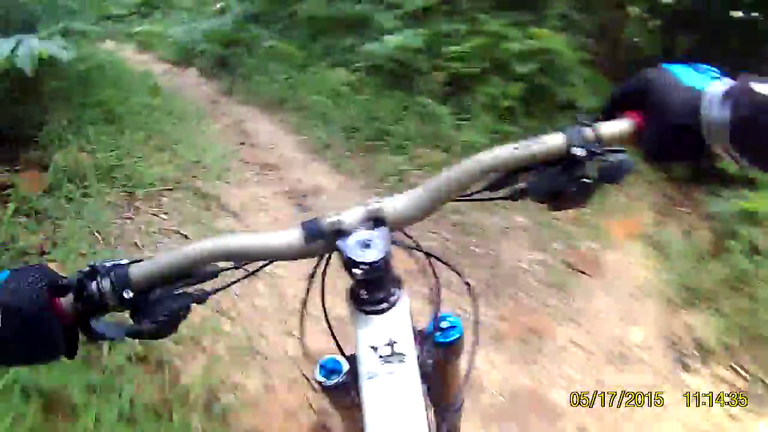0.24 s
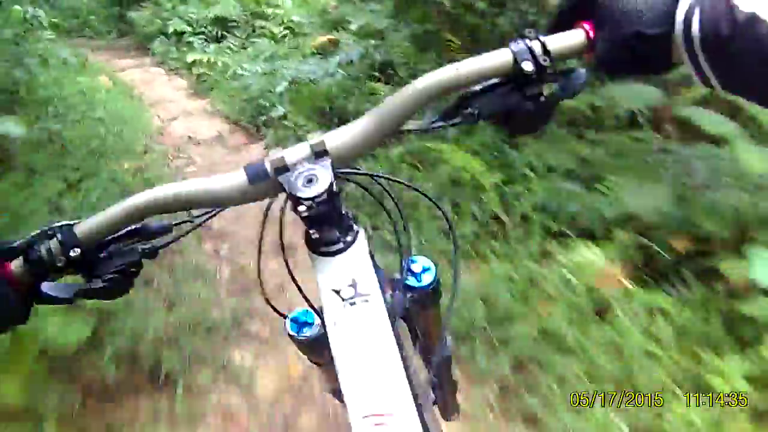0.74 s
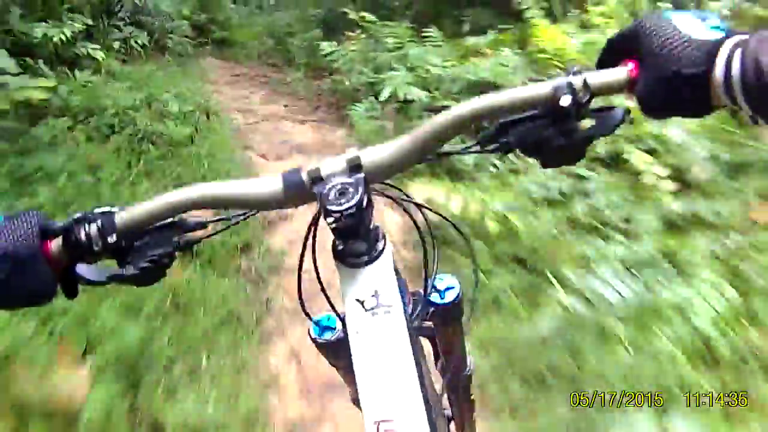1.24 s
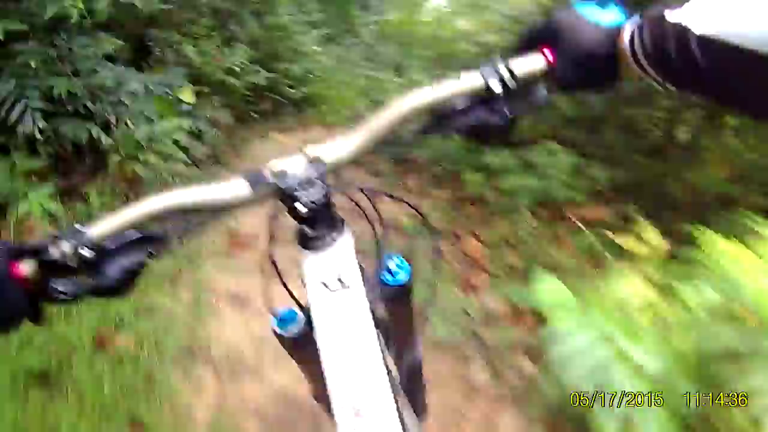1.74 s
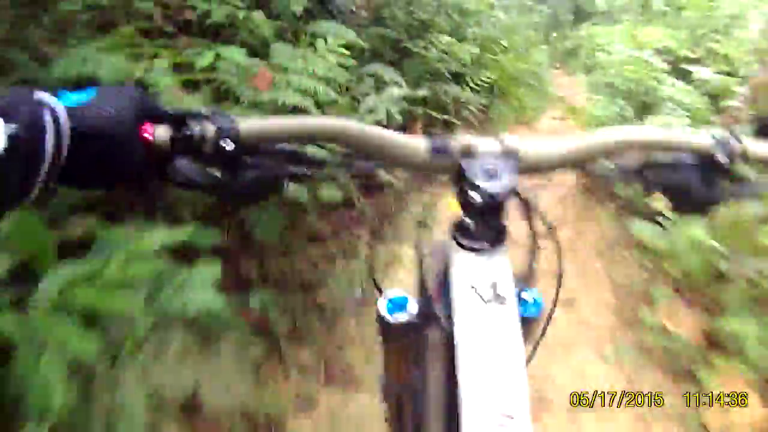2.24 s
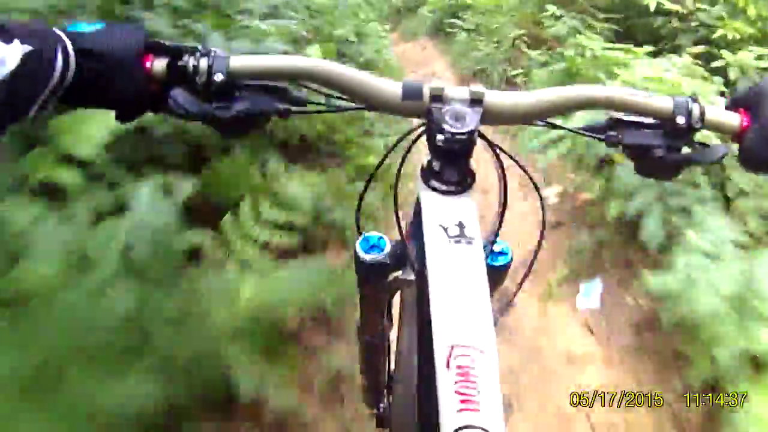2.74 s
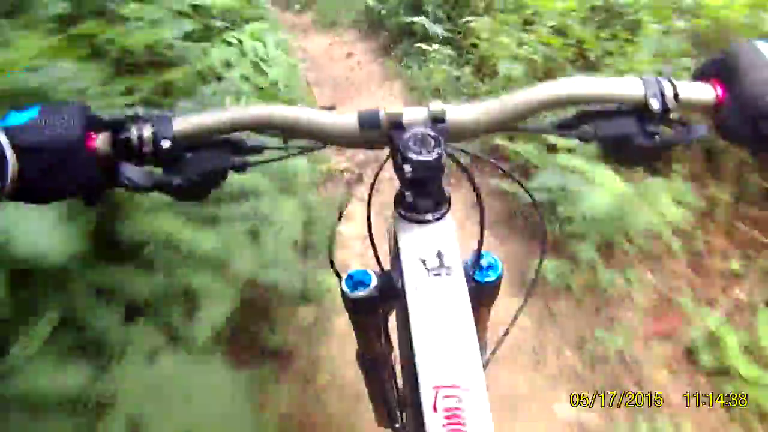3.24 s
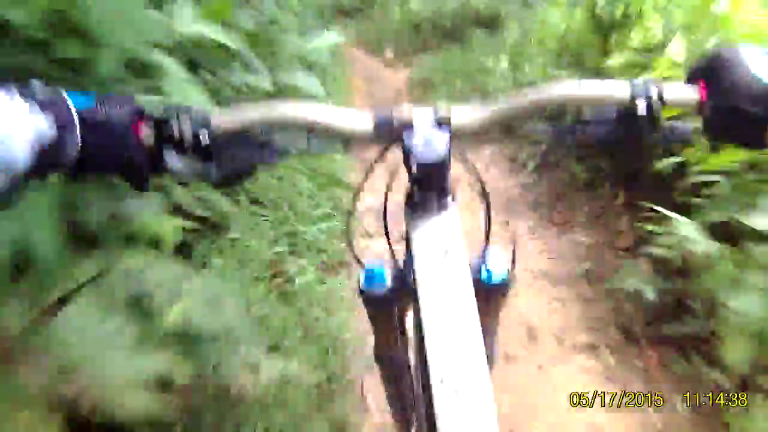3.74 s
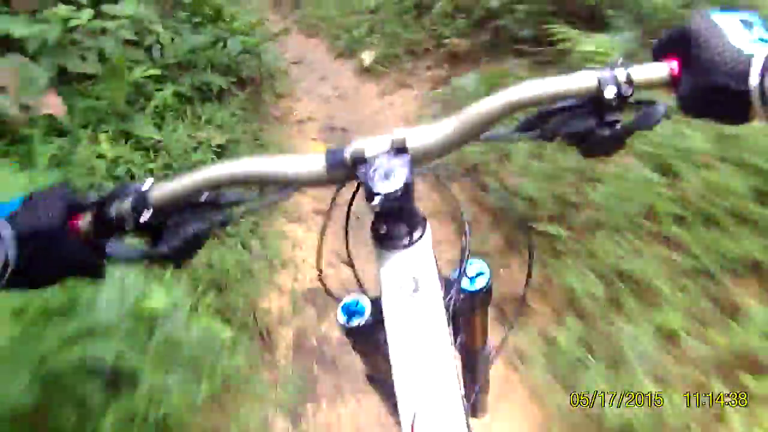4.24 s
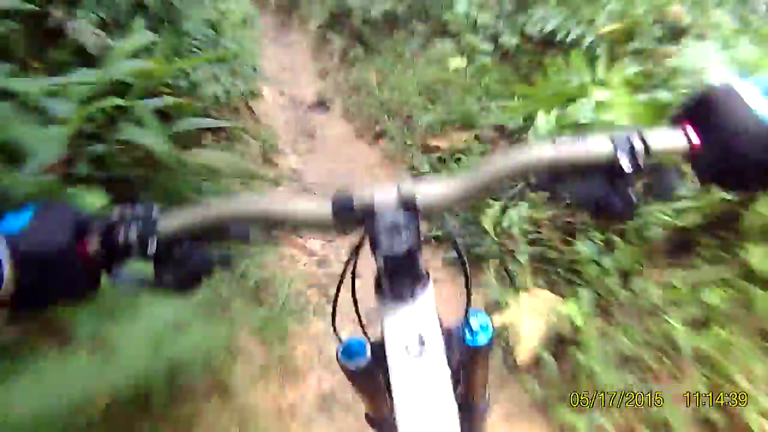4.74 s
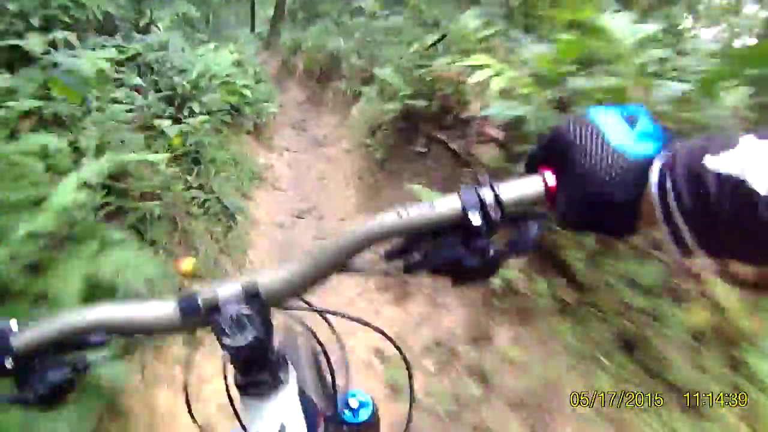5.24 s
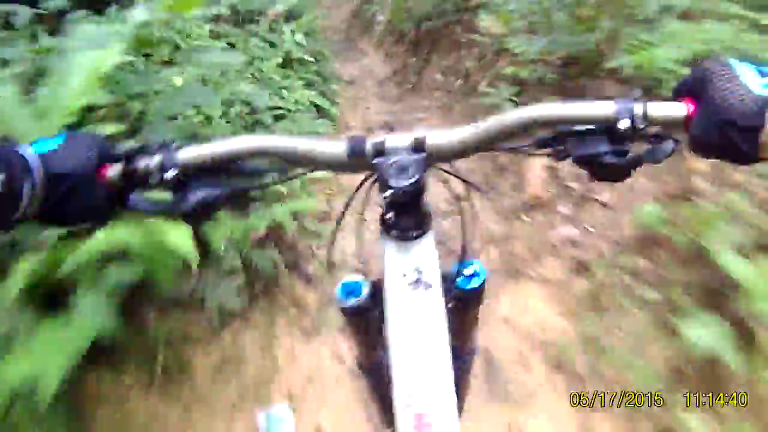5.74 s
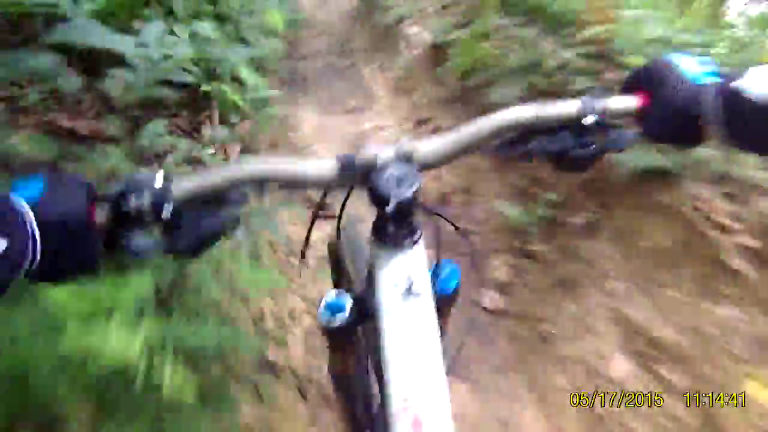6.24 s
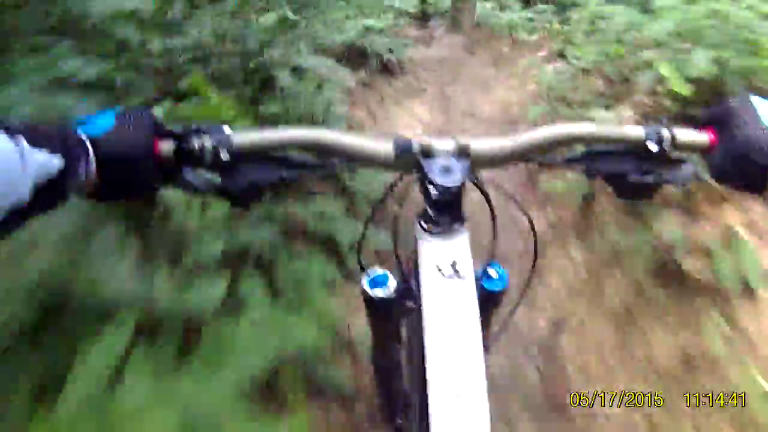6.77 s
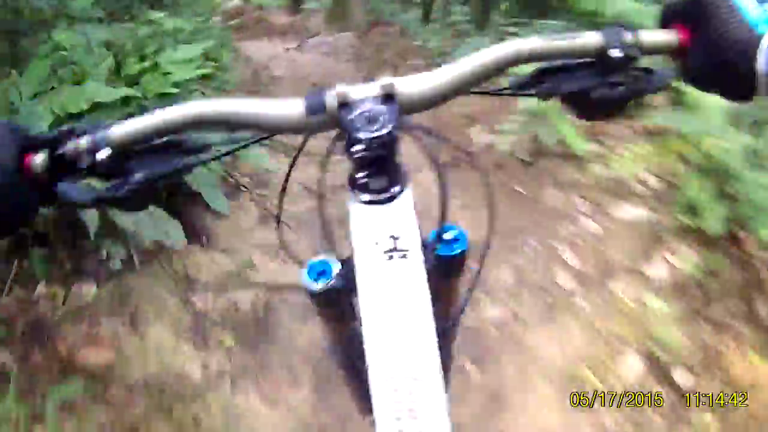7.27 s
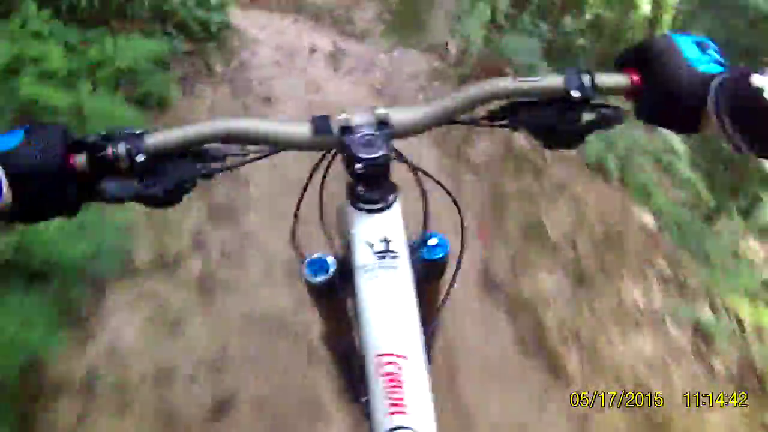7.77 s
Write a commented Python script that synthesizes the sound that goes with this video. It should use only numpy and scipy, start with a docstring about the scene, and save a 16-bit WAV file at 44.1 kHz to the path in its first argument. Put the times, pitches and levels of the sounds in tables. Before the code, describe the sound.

Outdoor ride on rough ground, very close and boxy microphone in a plastic housing. Soft wind rumble and gritty tyres open, with a small lever clack and leafy swishes. The trail then turns rough: clustered plastic knocks, chesty thumps, loose dirt scuffs and metallic chain showers. The hardest bumps clip around six seconds; a brief calmer spell brings brake squeaks and a grit tick before two or three last strong knocks.

```python
"""Rough dirt trail: a mountain bike rolls down, heard from a camera in a plastic case on the rider's chest.
Camera knocks ring the modes of the case and thuds are damped sines; wind and ground rumble are filtered noise.
Tyres, chain and leaves are filtered random clicks under gain curves; the brake chirps as short drifting sines.
A lever clack and one grit tick ring small mode sets. Hiss, a thin whine, clipping and band limits come last."""
import sys
import numpy as np
from scipy import signal
from scipy.fft import rfft, irfft, next_fast_len
from scipy.io import wavfile
from scipy.ndimage import uniform_filter1d

SR = 44100
rng = np.random.default_rng(int(sys.argv[2]) if len(sys.argv) > 2 else 0)


def wrap_up_sound(samples):
    """Save the sound to the file named by the first command line argument, as 16-bit audio."""
    columns = np.atleast_2d(samples).T
    # keep every value between -1 and 1, then stretch to whole-number steps
    tamed = np.clip(columns, -1, 1)
    steps = np.round(tamed * 32767).astype(np.int16)
    wavfile.write(sys.argv[1], SR, steps)


N = 353227
TIME = np.arange(N) / SR
EVENT_TIME = np.arange(SR // 8) / SR


def amp(db):
    """Decibels to gain."""
    return 10 ** (np.asarray(db) / 20)


def evened(x):
    """Scales x to rms 1."""
    return x / np.sqrt(np.mean(x ** 2) + 1e-20)


def noise():
    """White noise over the whole scene."""
    return rng.standard_normal(N)


def add(mix, start_s, sound):
    """Adds a sound into the mix in place, cut at the end of the mix."""
    part = mix[max(round(start_s * SR), 0):][:len(sound)]
    part += sound[:len(part)]


def coloured(x, spectrum):
    """Minimum-phase filter: the phase follows from the log gain by a Hilbert transform; rms 1."""
    size = next_fast_len(N + 8192)
    hz, db = np.transpose(spectrum)
    bin_hz = abs(np.fft.fftfreq(size, 1 / SR))
    log_gain = np.log(amp(np.interp(np.log(bin_hz + 1), np.log(hz), db)))
    response = np.exp(np.conj(signal.hilbert(log_gain)))[:size // 2 + 1]
    return evened(irfft(rfft(x, size) * response, size)[:N])


def wander(rate_hz):
    """Smooth random curve of rms 1: low-passed noise at SR / 64, interpolated."""
    count = N // 64 + 2
    hz = np.fft.rfftfreq(count, 64 / SR)
    slow = irfft(rfft(rng.standard_normal(count)) / (1 + (hz / rate_hz) ** 4))
    return evened(np.interp(np.arange(N) / 64, np.arange(len(slow)), slow))


def grains(per_s, spread_db):
    """Random clicks of either sign, most small and a few large; rms 1."""
    size = amp(spread_db * np.minimum(rng.exponential(1, N), 4))
    sign = rng.choice([-1, 1], N)
    return evened(size * sign * (rng.random(N) < per_s / SR))


def decay(t60_s):
    """Exponential decay by 60 dB in t60_s."""
    return np.exp(-np.log(1000) * EVENT_TIME / t60_s)


def ring(hz, t60_s):
    """One decaying sine mode."""
    return np.sin(2 * np.pi * hz * EVENT_TIME) * decay(t60_s)


def surge(rise_s):
    """Envelope that peaks at 1 after rise_s, then dies away."""
    u = EVENT_TIME / rise_s
    return u * np.exp(1 - u)


def swell(middle_s, length_s):
    """Gaussian rise and fall, length_s wide at 1/e."""
    out = np.zeros(N)
    near = slice(*np.searchsorted(TIME, [middle_s - 2 * length_s, middle_s + 2 * length_s]))
    out[near] = np.exp(-(2 * (TIME[near] - middle_s) / length_s) ** 2)
    return out


# base levels of the ride: t/s, wind level/dB, ground rumble level/dB, tyre crunch level/dB (all relative)
RIDE = [(0.0, -32.5, -43, -47.5), (0.38, -33, -42, -47.5), (0.8, -36, -46, -51), (1.18, -33, -44.5, -50.5),
        (1.63, -36, -47, -49), (2.09, -30.5, -40, -45.5), (2.85, -36.5, -48, -48),
        (4.08, -26, -36.5, -41.5), (4.79, -26.5, -39, -40.5), (5.08, -30.5, -43.5, -45),
        (5.35, -26, -42, -45.5), (5.81, -31.5, -44.5, -42.5), (6.26, -25.5, -33, -40.5),
        (6.57, -28.5, -38.5, -44), (6.93, -34.5, -42.5, -42.5), (7.33, -34, -45, -45),
        (7.64, -29, -40.5, -45), (8.0, -31.5, -41.5, -46.5)]


def ride(column, bump_db, lag_s, length_s):
    """Gain curve from one RIDE column, lifted around each knock, more for a stronger one, up to bump_db."""
    rows = np.array(RIDE)
    bumps = sum(amp(db / 2) * swell(s + lag_s, length_s) for s, db in KNOCKS)
    base_db = np.interp(TIME, rows[:, 0], rows[:, column])
    return amp(base_db + bump_db * np.tanh(2 * bumps))


# camera knocks in its case at the bumps: t/s, level/dB
KNOCKS = [(0.2719, -25), (.3577, -12), (0.7138, -17), (1.1001, -11.5), (1.3198, -23.5), (1.9462, -10.5),
          (2.131, -17), (2.2981, -7.5), (3.096, -7), (3.19, -20.5), (3.2503, -21.5), (3.4584, -10.5),
          (3.576, -1.5), (3.811, -10), (3.8796, -4), (3.9812, -4.5), (4.2058, -13.5), (4.5493, -5),
          (4.8498, -10), (5.1225, -9.5), (5.236, -3), (5.4338, -10), (5.53, -20), (5.5928, -10),
          (6.0605, -0.9), (6.2034, 2), (6.3387, -3.5), (6.3982, -7.5), (6.9423, -12), (7.2666, -14),
          (7.5479, -2.5), (7.774, 4)]
# modes of the case, before scatter and hardening: f/Hz, level/dB, t60/s, microphone side/+-1
CASE = [(250.3, -6, 0.037, 1), (452, -14.5, 0.075, -1), (593.1, -6, 0.059, 1), (654.2, -5.5, 0.045, -1),
        (761, -10.5, 0.024, -1), (1042, -8, 0.014, -1), (1165, -10.5, 0.019, -1), (1231, -4.5, 0.016, 1),
        (1508, -19, 0.033, -1), (2010, -20, 0.025, 1), (2167, -30.5, 0.029, 1), (2860, -41, 0.034, 1)]
HARDENING_DB_PER_OCT_PER_DB, EVEN_KNOCK_DB = .24, -7.5  # mode tilt against knock level


def knocks(pivot_hz=600, crack_db=-31, crack_t60_s=0.015, crack_hz=2700, crack_growth_db_per_db=.3,
           vary_db=1, detune=0.0077, sway_db=-19.5, sway_hz=70, sway_t60_s=.11):
    """Each knock rings slightly shifted case modes, cracks and sways the mount; a harder one is brighter."""
    out = np.zeros(N)
    mode_hz, mode_db, t60_s, side = np.transpose(CASE)
    sway = amp(sway_db) * ring(sway_hz, sway_t60_s)
    crack_filter = signal.butter(2, crack_hz, fs=SR)
    for s, db in KNOCKS:
        tilt_db_per_oct = HARDENING_DB_PER_OCT_PER_DB * (db - EVEN_KNOCK_DB)
        seat, stiffness = rng.standard_normal((2, len(CASE)))
        gain_db = mode_db + vary_db * seat + tilt_db_per_oct * np.log2(mode_hz / pivot_hz)
        shifted_hz = mode_hz * (1 + detune * stiffness)
        body = (np.sign(side) * amp(gain_db)) @ ring(shifted_hz[:, None], t60_s[:, None])
        crack = signal.lfilter(*crack_filter, rng.standard_normal(len(EVENT_TIME))) * decay(crack_t60_s)
        add(out, s, amp(db) * (body + amp(crack_db + crack_growth_db_per_db * db) * crack))
        add(out, s, -np.tanh(2 * amp(db - EVEN_KNOCK_DB)) * sway)  # sway saturates
    return out


# wheels hit roots and ruts: t/s, level/dB, f/Hz
THUDS = [(.151, -11, 186), (.163, -19, 430), (0.1766, -15, 247), (.45, -12.5, 140), (.642, -18, 131),
         (0.836, -21.5, 149), (1.029, -18, 140), (1.69, -17.5, 130), (1.763, -17.5, 150),
         (2.023, -16.5, 170), (2.225, -18.5, 180), (3.4872, -8.5, 111), (3.757, -11, 127),
         (3.8386, -3.5, 115), (3.9356, -8, 123), (4.027, -9.5, 110), (4.0561, -0.5, 240), (4.3845, -8, 126),
         (4.4782, -6, 232), (4.4876, -4.5, 249), (4.5082, -5, 185), (4.742, -5, 110), (5.4574, -6.5, 105),
         (5.621, -14.5, 201), (5.9605, -11, 125), (6.0388, -10, 139), (6.1087, -6.5, 115), (6.2572, 3, 125),
         (6.403, -3, 150), (6.4167, -1, 113), (6.4207, 4, 174), (7.493, -8.5, 108), (7.604, -3, 126),
         (7.8131, -6.5, 184)]
THUD_SWINGS = 3.3  # cycles per t60


def thuds(shudder_db=-16, shudder_s=0.0044, heave_db=-10, heave_hz=80, heave_t60_s=0.038):
    """Jolts through the rider: heavily damped swings over a deeper heave, then a noisy mount shudder."""
    swings, shake = np.zeros((2, N))
    heave = amp(heave_db) * ring(heave_hz, heave_t60_s)
    for s, db, hz in THUDS:
        add(swings, s, -amp(db) * (ring(hz, THUD_SWINGS / hz) + heave))
        add(shake, s, amp(db + shudder_db) * surge(shudder_s))
    return swings + shake * coloured(noise(), RUMBLE)


# strong eddies suck at the case: middle t/s, level/dB
GUSTS = [(.167, -9.5), (1.058, -13), (2.32, -13), (3.528, -8.5), (3.792, -9), (3.867, -3.5), (3.968, -6),
         (4.063, -9.5), (4.255, -8), (4.334, -5), (4.409, -9.5), (4.517, -3.5), (4.639, -9.5),
         (4.919, -10.5), (5.407, -7.5), (5.479, -3.5), (6.047, -4), (6.14, -10), (6.641, -10), (6.932, -15),
         (7.114, -8.5), (7.626, -6)]
GUST_S = 0.014
# wind spectrum: f/Hz, relative level/dB per Hz
WIND = [(8, -16.5), (22, 5), (42, -6.5), (65, -7.5), (100, -14.5), (160, -26.5), (300, -41), (900, -89)]


def wind(level_db=2, suction=0.21, rebound=0.33, rebound_stretch=4.0):
    """Eddies pass the case, sucking harder than they push; each strong one has a broad rebound."""
    eddies = coloured(noise(), WIND)
    eddies /= np.sqrt(uniform_filter1d(eddies ** 2, size=6000) + 0.062)  # levels slow swings
    skewed = evened(eddies - suction * (eddies ** 2 - 1))
    gusts = np.zeros(N)
    for s, db in GUSTS:
        gusts += amp(db) * (rebound * swell(s, rebound_stretch * GUST_S) - swell(s, GUST_S))
    airflow = ride(column=1, bump_db=4.5, lag_s=0.0045, length_s=0.13)
    return amp(level_db) * airflow * skewed + gusts


# tyre scuffs over loose dirt: middle t/s, level/dB, length/s
SCUFFS = [(0.166, -41, .025), (.605, -38, 0.013), (1.383, -39.5, .017), (2.497, -38, .014),
          (3.368, -38, .025), (3.838, -27, 0.0077), (3.911, -29, .025), (4.067, -30, .05),
          (4.269, -24, .026), (4.352, -31.5, 0.023), (4.485, -30, 0.02), (4.512, -23.5, 0.008),
          (4.71, -31.5, .012), (4.888, -38, 0.035), (4.998, -35.5, .014), (5.466, -35, 0.037),
          (5.71, -33.5, .01), (6.13, -37, .035), (6.257, -27, .009), (6.388, -32, 0.046),
          (6.421, -21, .009), (7.048, -28, .01), (7.109, -31, 0.019), (7.483, -34.5, 0.037),
          (7.674, -39, .015), (7.971, -34.5, 0.019)]
# tyre spectrum: f/Hz, relative level/dB per Hz
TYRE = [(300, -18.5), (620, -6), (720, -8), (950, -7.5), (1120, -4), (1280, 2.5), (1450, -0.5),
        (1720, -15.5), (2000, -5.5), (2500, -17), (3000, -19.5), (3700, -28.5), (6000, -37.5),
        (12000, -67.5)]


def tyres(level_db=0.33, clump_db=3.0, shift_db=2.5):
    """Knobs crush dirt in clumps and now and then slip; the colour shifts with the ground."""
    rolling = ride(column=3, bump_db=1, lag_s=.09, length_s=0.11)
    rolling = rolling * amp(level_db + clump_db * wander(rate_hz=73))
    slipping = sum(amp(db) * swell(s, length_s) for s, db, length_s in SCUFFS)
    crunch = coloured(grains(per_s=1200, spread_db=3.0) + 0.81 * noise(), TYRE)
    dull = signal.sosfiltfilt(signal.butter(3, 1700, fs=SR, output="sos"), crunch)
    shift = amp(shift_db * wander(rate_hz=17))
    return np.hypot(rolling, slipping) * evened(dull * shift + (crunch - dull) / shift)


# chain jingles: t/s, relative level/dB, relative brightness of the top/dB
JINGLES = [(1.9175, -49, 1), (2.0344, -47, -8), (2.8844, -43, -22), (3.4201, -36, -25), (3.4974, -46, 4),
           (3.676, -42, -23), (3.795, -42, 3), (3.8457, -46.5, 9), (3.9424, -48, 9), (3.9684, -43, -11),
           (4.0397, -50, 2), (4.056, -38, -14), (4.1235, -43, -28), (4.1525, -41, -25),
           (4.2557, -31.5, -19), (4.286, -32, -28), (4.344, -41, -7), (4.4063, -40.5, 0), (4.4892, -52, 11),
           (4.7107, -38, -20), (4.823, -31.5, -13), (4.9157, -37.5, -9), (5.284, -41, -24),
           (5.4954, -34, -18), (5.7284, -39.5, -22), (5.923, -45, -20), (6.0344, -41, -7),
           (6.4653, -35.5, -18), (6.6643, -51, -2), (7.0544, -39, -23), (7.4555, -47, 2), (7.6141, -49, 5)]
# chain spectrum: f/Hz, relative level/dB per Hz
CHAIN = [(2000, 4), (3700, -7), (4500, -0.5), (5000, -6.5), (5600, 1.5), (6800, -9.5), (8700, -11.5),
         (10700, -7.5), (12800, -14), (15000, -2), (16300, -19)]


def chain(level_db=-4, rise_s=0.0039, top_db=2, rattle_db=-24, clump_db=8.0):
    """Links clash in short showers, over a faint rattle that follows the tyre crunch level."""
    links = coloured(grains(per_s=1900, spread_db=2.5), CHAIN)
    top = signal.sosfiltfilt(signal.butter(2, 8500, "high", fs=SR, output="sos"), links)
    rattle = ride(column=3, bump_db=1.0, lag_s=.04, length_s=.08)
    low_gain = rattle * amp(rattle_db + clump_db * wander(rate_hz=37))
    top_gain = low_gain.copy()
    for s, db, bright_db in JINGLES:
        shower = amp(db + level_db) * surge(rise_s)
        add(low_gain, s, shower)
        add(top_gain, s, shower * amp(bright_db + top_db))
    return low_gain * (links - top) + top_gain * top


# brake pad catches the disc: middle t/s, level/dB, length/s, mean f/Hz
CHIRPS = [(2.235, -28.5, 0.011, 1387), (3.711, -26, .011, 1280), (7.045, -20, 0.0078, 1305),
          (7.049, -37, 0.0063, 1950), (7.051, -26, .008, 1470), (7.086, -27, .005, 1260),
          (7.092, -30, 0.0185, 1400), (7.13, -43, 0.02, 1300), (7.396, -33.5, 0.019, 1317)]


def brake(waver=0.034, flutter_db=3.5):
    """The disc sings briefly at a drifting pitch; the pad's grip flutters."""
    out = np.zeros(N)
    drift = 1 + waver * wander(rate_hz=180)
    grip = amp(flutter_db * wander(rate_hz=430))
    for s, db, length_s, hz in CHIRPS:
        near = abs(TIME - s) < 2 * length_s
        phase = 2 * np.pi * np.cumsum(hz * drift[near]) / SR
        envelope = (grip * swell(s, length_s))[near]
        out[near] += amp(db) * envelope * np.sqrt(2) * np.sin(phase)
    return out


def click(event, modes):
    """Sharp blow on a small hard part: all its modes start at once."""
    out = np.zeros(N)
    s, level_db = event
    add(out, s, sum(amp(level_db + db) * ring(hz, t60_s) for hz, db, t60_s in modes))
    return out


# one lever clack: t/s, level/dB
CLACK = (.9049, -21.5)
# lever modes: f/Hz, level/dB, t60/s
CLACK_MODES = [(650, -5.5, 0.043), (723, -3.5, 0.091), (1320, -7, .019), (2000, 0, 0.011),
               (3100, -3.5, 0.0063), (4150, -9.5, 0.011), (5570, -10, 0.014), (5700, -13, 0.019),
               (11800, -22, .008), (14900, -19, .006)]


def lever():
    """A handlebar lever clacks and rings its modes."""
    return click(CLACK, CLACK_MODES)


# one grit tick: t/s, level/dB
TICK = (7.1273, -21.5)
# modes the grit rings: f/Hz, level/dB, t60/s
TICK_MODES = [(2100, -12, .01), (2850, -16, .01), (3380, -12, .008), (4500, -3.5, 0.006),
              (5470, -7, 0.0056), (9750, -13, 0.0054), (10550, 3, 0.0033), (15000, -6, .005)]


def grit():
    """A flung grain ticks on the case and rings short, mostly high modes."""
    return click(TICK, TICK_MODES)


# leaves brush along the bike: middle t/s, level/dB, length/s
BRUSHES = [(0.15, -54, .065), (0.468, -45, 0.071), (0.609, -41, 0.0074), (1.38, -50.5, .044),
           (1.468, -49, .04), (1.561, -43, 0.054), (1.694, -49, 0.13), (2.044, -47, 0.06),
           (2.17, -46, 0.039), (2.895, -51, .018), (4.592, -42, .015), (6.385, -37, .01),
           (7.061, -43, 0.017), (7.11, -39, .014), (7.741, -38, .01)]
# leaf spectrum: f/Hz, relative level/dB per Hz
LEAVES = [(700, -20), (1300, 7), (1720, 0.5), (2050, 12), (2500, -4), (3000, -1.5), (3800, -14),
          (5600, -26), (9000, -26)]


def leaves():
    """Undergrowth swishes past: dense filtered clicks in short swells."""
    touch = sum(amp(db) * swell(s, length_s) for s, db, length_s in BRUSHES)
    return touch * coloured(grains(per_s=4000, spread_db=3.0), LEAVES)


# rumble spectrum, also of the mount shudder: f/Hz, relative level/dB per Hz
RUMBLE = [(60, -28.5), (120, 1.5), (180, -1.5), (260, -2), (350, -9), (450, -7.5), (520, -23), (620, -10.5),
          (720, -26), (1100, -25.5), (2500, -69.5)]


def rumble(level_db=1.0, lumpy_db=3.0):
    """Small bumps in the ground shake the case without pause."""
    shaking = ride(column=2, bump_db=3.5, lag_s=0.034, length_s=0.07)
    return amp(level_db + lumpy_db * wander(rate_hz=32)) * shaking * coloured(noise(), RUMBLE)


def scene():
    """Sums all sources at the microphone, one channel."""
    bike = thuds() + chain() + brake() + lever()
    trail = tyres() + grit() + leaves() + rumble()
    return (knocks() + wind() + bike + trail)[None]


# hiss spectrum: f/Hz, relative level/dB per Hz
HISS = [(100, -16), (3000, 10), (6500, 6.5), (8700, 4), (9900, 6.5), (11500, 2.5), (13500, 4), (15500, 4),
        (16500, -36.5)]
EDGE_HZ = 16100


def record(dry, hiss_db=-62, whine_db=-81, ceiling=0.864, coupling_hz=9):
    """Adds hiss and a thin electronic whine, clips peaks at the ceiling, then limits the band."""
    whine = sum(np.sin(2 * np.pi * hz * TIME + wander(rate_hz=9)) for hz in (9982, 10058))
    wet = dry + amp(hiss_db) * coloured(noise(), HISS) + amp(whine_db) * whine
    clipped = np.clip(wet, -ceiling, ceiling)
    # the coupling capacitor makes flattened peaks sag
    coupled = signal.lfilter(*signal.butter(1, coupling_hz, "high", fs=SR), clipped)
    low_pass = signal.firwin(255, EDGE_HZ, window=("kaiser", 9), fs=SR)
    return signal.oaconvolve(coupled, low_pass[None], "same")


dry = scene()
out = record(dry)
wrap_up_sound(out)
```